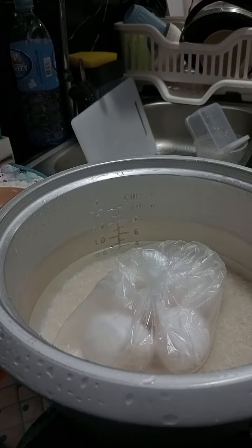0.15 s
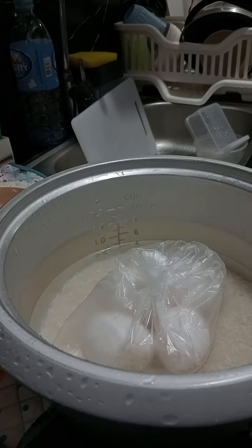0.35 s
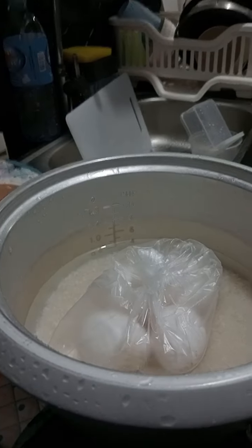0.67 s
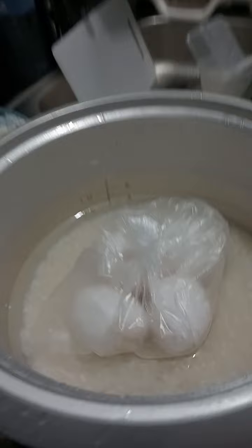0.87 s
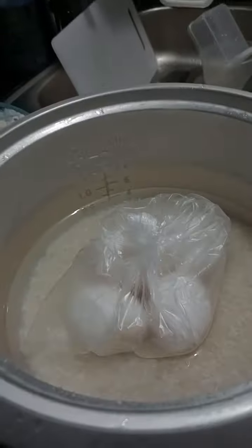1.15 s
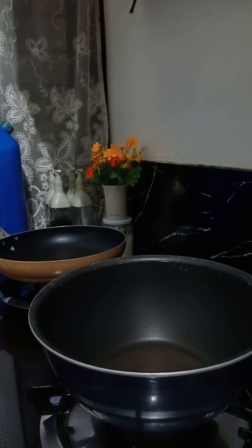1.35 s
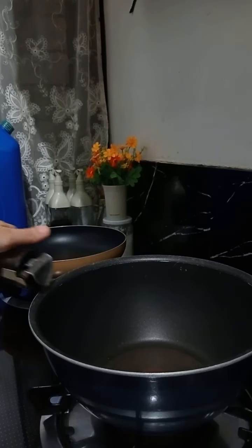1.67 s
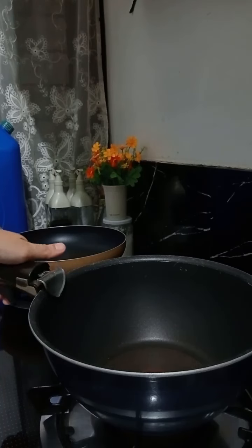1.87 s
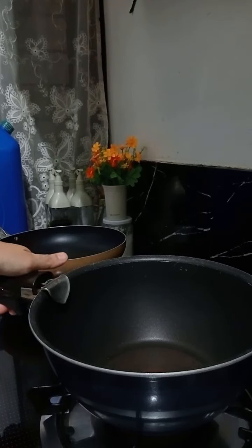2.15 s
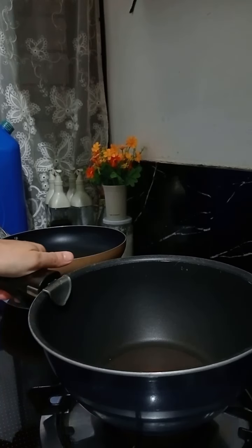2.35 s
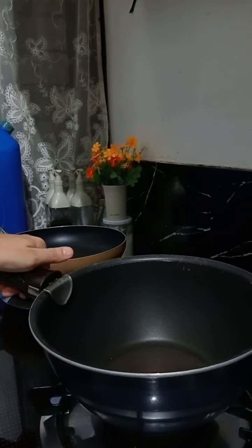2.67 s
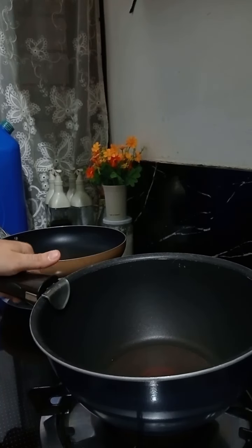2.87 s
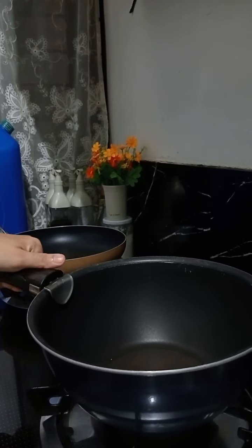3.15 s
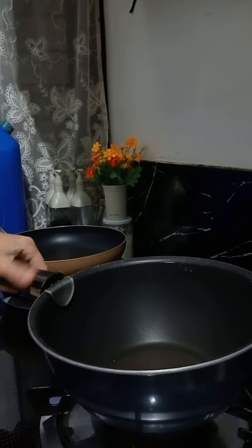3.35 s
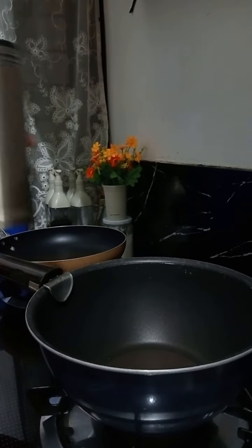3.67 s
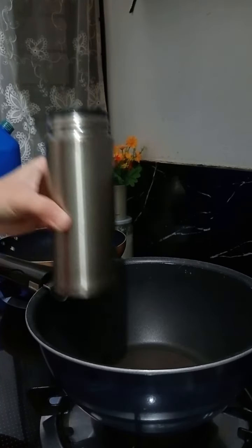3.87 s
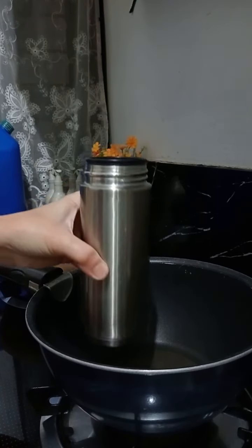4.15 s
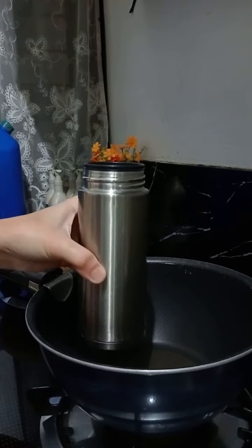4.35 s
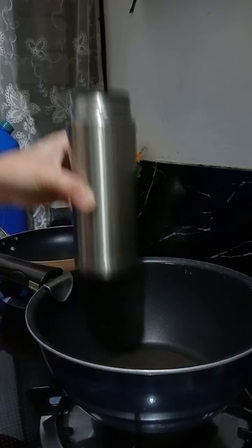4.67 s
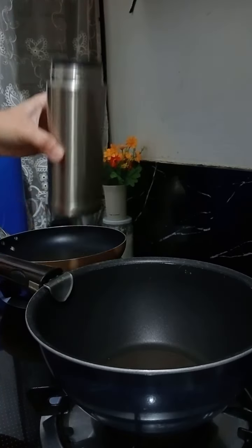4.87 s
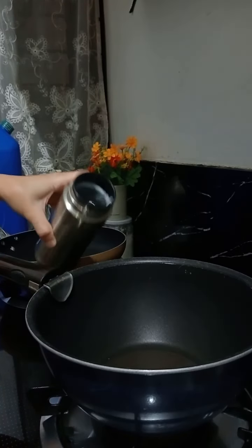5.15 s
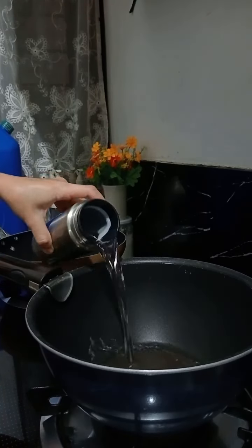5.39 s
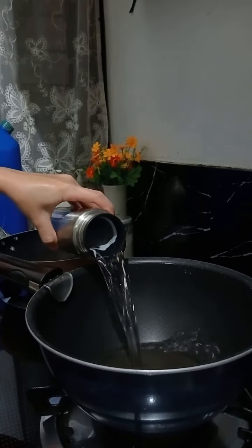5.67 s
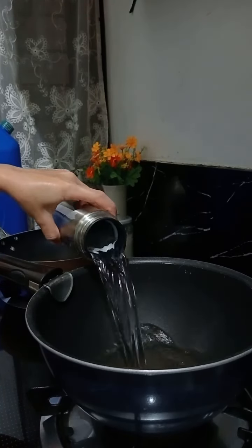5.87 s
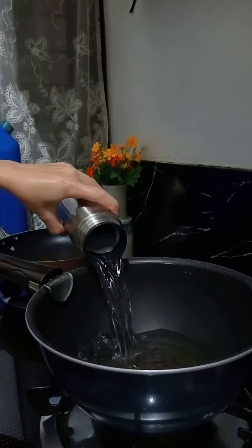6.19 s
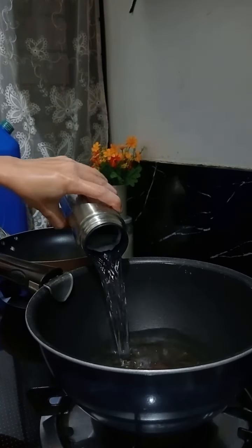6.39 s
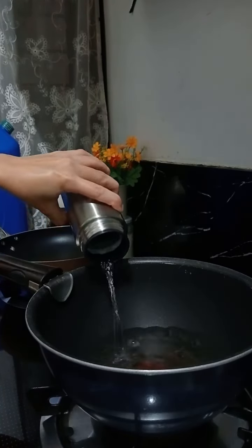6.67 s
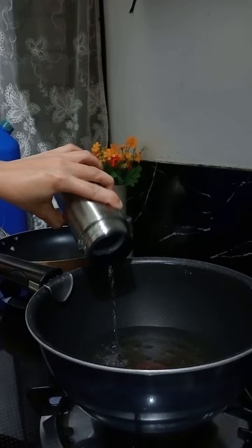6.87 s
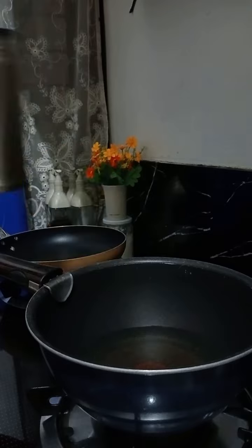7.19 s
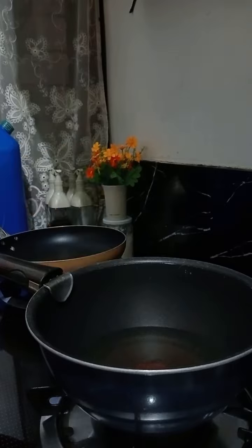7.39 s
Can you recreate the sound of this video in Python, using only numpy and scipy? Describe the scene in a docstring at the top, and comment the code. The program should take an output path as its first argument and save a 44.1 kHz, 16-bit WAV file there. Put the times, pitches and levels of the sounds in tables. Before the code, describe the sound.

Quiet kitchen with faint echoing drips; a steel handle clacks and clicks onto a pan, then water pours in briefly and ends in plops.

```python
"""A hand clamps a steel handle onto a pan: modal ringing under rough contact forces, with stick-slip scraping.
Water then pours into the pan as a crowd of damped bubble tones over hiss, and ends in plops.
A tap drips in a far, echoing corner; hand and sleeve brush softly as shaped friction noise.
The house adds rumble, air noise and narrow hums. Twice the whole sound dips briefly to silence."""
import sys
import numpy as np
from scipy import signal
from scipy.fft import rfft, irfft, next_fast_len
from scipy.io import wavfile
from scipy.ndimage import uniform_filter1d, map_coordinates

SR = 44100
rng = np.random.default_rng(int(sys.argv[2]) if len(sys.argv) > 2 else 0)


def waveform_to_disk(signal):
    """Save audio, clipped to [-1, 1], as 16-bit WAV at the path in sys.argv[1]."""
    frames = np.transpose(np.atleast_2d(signal))
    scaled = np.clip(frames, -1, 1) * 32767
    samples = np.round(scaled).astype(np.int16)
    wavfile.write(sys.argv[1], SR, samples)


N = 332028  # length [samples]

# Spectra give relative power density; filtering normalises their total power.
# Contacts of clamp and pan: (time [s], crack [dB], treble [dB], pan [dB], clamp [dB],
# favoured mode [Hz], its level [dB], rise time constant [s], decay by 60 dB [s])
CONTACTS = [(1.521, -62, -62, -62, -81, 1161, -62, .0005, .061),
            (1.763, -55, -75, -51, -70, 1340, -40, .001, .09),
            (1.772, -64, -85, -80, -76, 2110, -36, .005, .03),
            (1.785, -44, -70, -73, -57, 455, -38, .006, .07),
            (2.14, -38, -45, -56.5, -39, 2110, -32, .0045, .083),
            (2.155, -35.5, -52.5, -42, -52, 3390, -41, .0059, .11),
            (2.342, -38.5, -49, -38, -47, 3560, -32, .0052, .1),
            (2.357, -29, -38.5, -40, -71, 787, -42, .0042, .018),
            (2.409, -55, -65, -44, -79, 346, -50, .015, .11),
            (2.538, -31, -31, -58, -54.5, 3600, -24, .0045, .12),
            (2.55, -15.5, -20, -28, -32, 3720, -11, .002, .024),
            (2.57, -29.5, -41, -44.5, -40, 1161, -35.5, .008, .33),
            (2.838, -51, -58.5, -55, -67, 6435, -66, .031, .13),
            (2.965, -37, -68, -44, -62, 3700, -44, .00053, .031),
            (3.046, -37.5, -57, -44, -57, 1161, -38, .007, .09),
            (3.064, -38.5, -57.5, -39, -69, 1161, -35, .0043, .087),
            (3.112, -60.5, -80, -50, -70, 642, -29, .0005, .043),
            (3.334, -57.5, -77.5, -61, -74, 787, -48, .04, .12),
            (3.419, -30.5, -51, -39, -70, 3390, -36, .002, .045)]
# Modes of the pan: (frequency [Hz], width [Hz], level [dB])
PAN_MODES = [(260, 120, 1), (346, 50, 0.5), (455, 29, 2.5), (599.4, 140, 4), (642, 72, 0.5), (787, 140, 2),
             (1150, 13, -2)]
# Modes of the clamp: (frequency [Hz], width [Hz], level [dB])
CLAMP_MODES = [(1340, 40, -8), (2110, 9, -1), (3040, 70, -4), (3390, 45, -3), (3600, 150, -8),
               (3720, 450, -6), (4110, 17, 2.5), (4700, 90, -3), (5070, 60, -6), (5410, 39, -10),
               (6435, 40, -9), (8200, 38, -18.5), (9100, 98, -13), (10900, 40, -21)]
# Spectrum of the contact crack: (frequency [Hz], density [dB])
CRACK_SPECTRUM = [(60, -43), (130, 0.5), (250, -1.5), (600, -4.5), (1200, 1.5), (2200, 2.5), (3700, -1),
                  (4700, -11.5), (6000, -23), (9000, -73)]
# Spectrum of the contact treble: (frequency [Hz], density [dB])
TREBLE_SPECTRUM = [(2650, -21), (4500, -4), (4840, -10), (7070, -16), (10500, -2), (13300, -16),
                   (15200, -14), (15600, -22.5)]
# Jerks of the clamp along the rim: (time [s], peak [dB], swell by 20 dB [s], fade by 20 dB [s])
RIM_JERKS = [(2.772, -65, .014, .033), (2.845, -66.5, .058, .045), (3.03, -60.5, .02, .17),
             (3.165, -67, .08, .055), (3.3, -70, .07, .09), (3.44, -74, .09, .3)]
# Modes sung by the sliding jaw: (frequency [Hz], width [Hz], level [dB])
JAW_MODES = [(4900, 68, -8), (5170, 48, -15), (5770, 53, -2.5), (6170, 44.8, 2), (6600, 59, 4),
             (7220, 60.3, 1), (7550, 39.8, -5), (8250, 120, -2.5), (8700, 50, -12), (9100, 120, 4),
             (9800, 31, -6), (10800, 110, -20.5), (11600, 110, -7), (12600, 100, -10)]
# Brushes of hand and sleeve: (time [s], peak [dB], swell by 20 dB [s], fade by 20 dB [s])
HAND_BRUSHES = [(.206, -63.5, .014, .04), (.342, -72.5, .3, .2), (.6, -76, .4, .4), (.842, -64, .01, .12),
                (1.282, -63, .022, .2), (1.426, -58, .1, .065), (1.52, -57, .008, .2),
                (2.03, -67, .11, .03), (3.578, -51.5, .03, .08), (3.7, -64, .02, .3),
                (3.766, -64, .1, .095), (4.346, -65.5, .01, .17), (7.226, -58.5, .027, .135),
                (7.5, -71, .04, .3)]
# Spectrum of friction noise, brushed or scraped: (frequency [Hz], density [dB])
FRICTION_SPECTRUM = [(590, -44), (1000, -26), (1330, -7), (1490, -5.5), (1620, -4), (2780, -9),
                     (3880, -4.5), (7720, -24.5), (9940, -17.5), (15600, -35)]
# Far drips: (time [s], level at the tap [dB], bubble pitch [Hz], pitch rise [share])
TAP_DRIPS = [(.09, -61, 3510, .03), (0.148, -44.5, 1616, 0.14), (.29, -60, 3420, 0.042),
             (0.323, -56, 4370, 0.19), (0.507, -45.5, 1654, 0.12), (0.616, -60, 3790, 0.025),
             (.69, -50.5, 1955, 0.084), (0.779, -54.5, 3920, 0.023), (.975, -45, 3755, 0.022),
             (1.06, -47, 2096, 0.055), (1.238, -52, 1090, 0.061), (1.298, -47, 1340, 0.037),
             (1.67, -55, 3090, 0.087), (1.67, -57.5, 4150, 0.11), (3.58, -52.5, 3530, 0.49),
             (3.891, -53, 1599, .05), (4.07, -47.5, 3370, 0.32), (4.265, -50.5, 2220, 0.082),
             (4.341, -50, 3230, 0.3), (4.465, -48, 1486, 0.094), (4.469, -59.5, 4160, 0.035),
             (4.525, -52.5, 4410, 0.058), (4.645, -47.5, 2020, 0.17), (4.7, -51.5, 4140, .05),
             (4.84, -53, 1690, .06), (4.92, -50.5, 3840, 0.032), (4.955, -52.5, 4420, 0.061),
             (5.025, -49.5, 2085, .08), (5.22, -48.5, 1980, 0.14), (5.404, -47, 1708, .1),
             (5.599, -52, 1800, 0.085), (5.69, -53, 2760, .04), (5.699, -53, 4220, 0.045),
             (6.384, -46.5, 1842, .05), (6.388, -49, 3760, 0.053)]
DRIP_FAR_DB = -22.5  # what reaches across the house
# The pouring stream: (time [s], level [dB])
STREAM_FLOW = [(5.2, -84), (5.3, -76), (5.78, -75), (5.93, -65), (6.18, -61), (6.26, -69), (6.5, -71),
               (6.62, -69), (6.7, -73), (6.85, -67), (7.03, -71), (7.15, -105)]
FULL_DB, SPRAY_DB = -60, -64  # full flow, and the spray at full flow
HISS_DB, SPRAY_GROWS = 1.2, 1.1  # hiss over bubbles; spray dB per dB of flow
# Spectrum of the stream's hiss: (frequency [Hz], density [dB])
HISS_SPECTRUM = [(290, -7), (500, 22), (578, -2), (782, 27), (963, -12.5), (1290, 5.5), (3680, 18.5),
                 (5240, -53.5), (6000, -52), (7800, -48), (13200, -120)]
# Spectrum of spray and mist: (frequency [Hz], density [dB])
SPRAY_SPECTRUM = [(2600, -30), (4500, -20), (6200, -5), (7800, -13), (9800, 2), (11500, -8), (13500, -9),
                  (15600, -12)]
# Drops in the pan: (time [s], bubble [dB], bubble pitch [Hz], splash [dB], splash pitch [Hz])
PAN_PLOPS = [(5.28, -58, 2030, -69, 6240), (5.319, -72, 1940, -72, 8800), (5.355, -39.5, 3230, -72, 10100),
             (5.408, -45, 4040, -70, 10200), (5.448, -65, 1780, -69.5, 9400), (5.492, -60, 1660, -68, 6790),
             (5.553, -57.5, 1970, -64, 6700), (5.623, -54, 1940, -68, 7270), (5.688, -56, 2940, -63, 7200),
             (5.732, -54, 1830, -76, 9770), (5.745, -48.5, 4860, -71, 5580), (5.807, -45, 4590, -77, 5380),
             (5.867, -47, 1800, -77, 9100), (5.909, -51, 2600, -70, 6250), (5.948, -48.5, 3530, -78, 9180),
             (5.999, -50.5, 1850, -77, 6170), (6.048, -53.5, 1540, -67.5, 9110),
             (6.147, -52.5, 1280, -67, 9950), (6.185, -55, 2500, -66, 9800),
             (6.219, -56.5, 2260, -70.5, 6080), (6.382, -48.5, 3760, -65, 8400),
             (6.409, -67, 1820, -75, 7250), (6.463, -68, 1790, -74, 14100), (6.583, -41, 3090, -64, 5670),
             (6.597, -45, 3070, -70, 5980), (6.662, -41.5, 4000, -71, 5600), (6.716, -38, 774, -61, 4400),
             (6.728, -45, 1150, -64, 10500), (6.776, -49.5, 2290, -64, 6700), (6.826, -50, 2570, -59, 7200),
             (6.836, -44.5, 2720, -58, 10300), (6.897, -40, 3790, -80, 6860), (6.947, -43, 4520, -79, 9400)]
PLOP_T60_S = .048
FROTH_DB, MIST_DB = -2.5, 2.5  # froth over the bubble, mist over the splash
# Modes of the pan's floor under falling drops: (frequency [Hz], width [Hz], level [dB])
FLOOR_MODES = [(3250, 71, 0), (3900, 29, -10), (4150, 110, -3), (4860, 140, -8), (5570, 38, -18),
               (5860, 97, -17), (6380, 99, -16), (6770, 66, -14), (7050, 180, -15), (7870, 43, -20),
               (8480, 86, -17), (9050, 120, -18), (9430, 50, -21), (10100, 60, -19)]
FLOOR_DB, DAMPING_DB_PER_S = 14.7, 4.45  # floor over splash when dry; rising water damps it
# Rumble of the house: (time [s], level [dB])
RUMBLE_LEVEL = [(0, -61), (1.2, -59.5), (1.3, -62.5), (3.4, -59), (3.6, -61.5), (5.5, -63.5), (7, -60),
                (7.53, -62.5)]
# Spectrum of the rumble: (frequency [Hz], density [dB])
RUMBLE_SPECTRUM = [(15, -54.5), (30, -30.5), (48, -10), (64, 7.5), (85, 1.5), (125, 2), (250, -15),
                   (500, -12.5), (900, -19), (1800, -62.5)]
# Spectrum of the air noise: (frequency [Hz], density [dB])
AIR_SPECTRUM = [(200, -40.5), (500, 1), (1000, 4), (2500, -1), (4000, -4), (5200, -16.5), (8000, -31),
                (10000, -20), (12500, -36.5), (15600, -38)]
AIR_DB = -63.7
# Wavering hums: (frequency [Hz], width [Hz], level [dB])
HOUSE_HUMS = [(160.3, 34, -65), (260, 21, -72), (362, 22, -70), (755.5, 27, -78)]
WHINE_HZ, WHINE_DB = 6540, -91.5
# Reverberation of the kitchen, before stretching: (frequency [Hz], decay by 60 dB [s])
KITCHEN_DECAY = [(200, 0.28), (2000, .35), (6000, 0.35), (14000, 0.23)]
# Brief silences: (time [s], half length [s])
SILENCES = [(1.264, 0.0067), (3.477, 0.0099)]
TOP_HZ = 15700  # band limit


def amp(db):
    """Decibel law: the amplitude ratio of a level."""
    return 10 ** (np.asarray(db) / 20)


def unit(x):
    """Power normalisation: x scaled to an RMS of 1."""
    return x / np.sqrt(np.mean(x ** 2) + 1e-20)


def along(points, hz):
    """Logarithmic pitch scale: (frequency, value) points interpolated on a log axis."""
    f, v = np.transpose(points)
    return np.interp(np.log(hz + 1), np.log(f + 1), v)


def level_curve(rows):
    """Amplitude envelope: gain per sample, linear in dB between rows and silent outside them."""
    s, db = np.transpose(rows)
    return amp(np.interp(np.arange(N) / SR, s, db, -150, -150))


def swells(rows):
    """Exponential growth and decay: summed gain of strokes that each swell to a peak and fade."""
    t = np.arange(0, N, 32) / SR
    gain = np.zeros(len(t))
    for s, db, rise, fall in rows:
        gain += amp(db - 20 * np.maximum((s - t) / rise, (t - s) / fall))
    return np.interp(np.arange(N) / SR, t, gain)


def wobble(rate):
    """Band-limited fluctuation: a smooth random curve with rate knots a second."""
    at = np.arange(0, N, 16)
    knots = rng.standard_normal(int(N * rate / SR) + 4)
    return np.interp(np.arange(N), at, map_coordinates(knots, [at * rate / SR]))


def patchy(depth_db):
    """Time-frequency modulation: white noise with smooth patches of random gain."""
    z = signal.stft(rng.standard_normal(N), nperseg=512)[2]
    over_hz = uniform_filter1d(rng.standard_normal(z.shape), 6, 0)
    field = uniform_filter1d(over_hz, 8, 1)
    return unit(signal.istft(z * amp(depth_db * unit(field)), nperseg=512)[1][:N])


def filtered(x, response):
    """Linear filtering: x through a frequency response whose power gain for white noise is 1."""
    m = next_fast_len(N + SR // 2)
    h = response(np.fft.rfftfreq(m, 1 / SR))
    gain = unit(np.abs(h)) * np.exp(1j * np.angle(h))
    return irfft(rfft(x, m) * gain, m)[:N]


def coloured(x, spectrum):
    """Spectral shaping: x filtered by the density points of a spectrum."""
    return filtered(x, lambda hz: amp(along(spectrum, hz)))


def resonant(x, modes):
    """Modal superposition: x through parallel resonances of alternating sign."""
    def response(f):
        total = 0
        for k, (c, w, db) in enumerate(modes):
            total = total + (-1) ** k * amp(db) * 1j * f * w / (c * c - f * f + 1j * f * w)
        return total
    return filtered(x, response)


def note(x, hz, width_hz):
    """Damped resonance: x ringing in one mode, at unchanged noise power."""
    r = np.exp(-np.pi * width_hz / SR)  # pole radius
    edge = np.sqrt(1 - r * r)
    return signal.lfilter([edge, 0, -edge], [1, -2 * r * np.cos(2 * np.pi * hz / SR), r * r], x)


def struck(shape, modes):
    """Forced vibration: a rough force drives modes whose energy shares vary by a few dB."""
    total = np.zeros(len(shape))
    for hz, width, db in modes:
        force = shape * rng.standard_normal(len(shape))
        near = note(force, hz, hz / 2)  # a mode feels only the force near its pitch
        ring = unit(note(near, hz, width))
        total += amp(db + 1.2 * rng.standard_normal()) * ring
    return total * np.std(shape)


def bubble(hz, rise, t60, attack):
    """Bubble resonance: a damped tone whose pitch climbs by the share rise over its first 20 dB of decay."""
    t = np.arange(round(t60 * SR) + 2) / SR
    phase = 2 * np.pi * hz * (t + 1.5 * rise * t * t / t60)
    return np.sin(phase) * amp(-60 * t / t60) * (1 - np.exp(-t / attack))


def tail(stretch):
    """Diffuse reverberation: a fresh noise response of energy 1 whose decay depends on frequency."""
    hz, t, z = signal.stft(rng.standard_normal(SR // 3), SR, nperseg=128)
    t60 = stretch * along(KITCHEN_DECAY, hz)[:, None]
    answer = signal.istft(z * amp(-60 * t / t60), SR, nperseg=128)[1]
    return answer / np.linalg.norm(answer)


def roomy(x, wet_db):
    """Direct and reverberant field: x plus the kitchen's answer, 300 samples later."""
    return x + amp(wet_db) * signal.fftconvolve(x, np.pad(tail(stretch=1), (300, 0)))[:N]


def add(track, s, sound):
    """Superposition: mixes sound into track from second s."""
    part = track[round(s * SR):][:len(sound)]
    part += sound[:len(part)]


def house():
    """Background noise: restless low rumble, steady air hiss, wavering hums and a faint early whine."""
    rumble = level_curve(RUMBLE_LEVEL) * amp(wobble(20)) * coloured(patchy(depth_db=1.0), RUMBLE_SPECTRUM)
    air = amp(AIR_DB) * coloured(patchy(depth_db=2.5), AIR_SPECTRUM)
    hums = np.zeros(N)
    for hz, width, db in HOUSE_HUMS:
        hums += amp(db + 1.2 * wobble(4.8)) * note(rng.standard_normal(N), hz, width)
    before_first_silence = np.arange(N) < SILENCES[0][0] * SR
    whine = amp(WHINE_DB) * note(rng.standard_normal(N), WHINE_HZ, 120) * before_first_silence
    return rumble + air + hums + whine


def tap():
    """Reverberant propagation: each far drip is a bubble heard only through its own slowly building echo."""
    out = np.zeros(N)
    for s, db, hz, rise in TAP_DRIPS:
        echo = tail(stretch=0.98)
        echo *= 1 - np.exp(-np.arange(len(echo)) / SR / .012)
        drip = signal.fftconvolve(bubble(hz, rise, t60=0.064, attack=0.00017), echo)
        add(out, s, amp(db + DRIP_FAR_DB) * unit(drip))
    return out


def rustle():
    """Soft friction: shaped noise swells and fades under the moving hand."""
    return swells(HAND_BRUSHES) * coloured(patchy(depth_db=1.2), FRICTION_SPECTRUM)


def clamp():
    """Impact excitation: each rough contact force cracks, rings pan and clamp, and favours one mode."""
    force, rings = np.zeros((2, N)), np.zeros(N)
    t = np.arange(-SR // 10, SR // 3) / SR  # around the peak of the force
    for s, crack_db, treble_db, pan_db, clamp_db, hz, note_db, rise, t60 in CONTACTS:
        shape = np.exp(np.minimum(t, 0) / rise) * amp(-60 * np.maximum(t, 0) / t60)
        for bus, db in zip(force, [crack_db, treble_db]):
            add(bus, s + t[0], amp(db) * shape * rng.standard_normal(len(t)))
        mode_hz, width_hz, _ = min(PAN_MODES + CLAMP_MODES, key=lambda mode: abs(mode[0] - hz))
        pan_ring = amp(pan_db) * struck(shape, PAN_MODES)
        clamp_ring = amp(clamp_db) * struck(shape, CLAMP_MODES)
        favoured = struck(shape, [(mode_hz, width_hz, note_db)])
        add(rings, s + t[0], pan_ring + clamp_ring + favoured)
    force *= unit(amp(2.0 * wobble(160)))  # the parts chatter against each other
    return coloured(force[0], CRACK_SPECTRUM) + coloured(force[1], TREBLE_SPECTRUM) + rings


def slide():
    """Sliding friction: steel dragged on steel makes rough noise, partly singing in the jaw's modes."""
    roughness = unit(amp(3 * wobble(120)))
    rough = swells(RIM_JERKS) * roughness * rng.standard_normal((2, N))
    return amp(5.5) * coloured(rough[0], FRICTION_SPECTRUM) + resonant(rough[1], JAW_MODES)


def bubble_crowd():
    """Bubble entrainment: many small bubbles of random pitch sound at random times along the stream."""
    crowd = np.zeros(N)
    start, end = STREAM_FLOW[0][0], STREAM_FLOW[-1][0]
    z, size = rng.standard_normal((2, 2000, 1))
    hz = np.clip(2800 * np.exp(0.53 * z), 600, 12000)
    small = amp(3.5 * size) * bubble(hz, 0.024, t60=0.045, attack=.004)
    for u, sound in zip(rng.random(len(small)), small):
        add(crowd, start + (end - start) * u, sound)
    crowd = signal.fftconvolve(crowd, tail(stretch=0.19))[:N]  # the pan's bowl blurs them
    # the crowd grows fainter above about 5 kHz
    return unit(filtered(crowd, lambda hz: 1 / (1 + (hz / 4800) ** 4) + 0.12))


def plops():
    """Drop impact: each drop sounds a bubble with froth, a splash with mist, and the pan's floor."""
    out, mist, floor = np.zeros((3, N))
    t = np.arange(SR // 8) / SR
    envelope = amp(-60 * t / PLOP_T60_S) * (1 - np.exp(-t / 0.0035))
    for s, db, hz, splash_db, splash_hz in PAN_PLOPS:
        burst = envelope * rng.standard_normal((4, len(t)))
        add(out, s, amp(db) * bubble(hz, 0.062, PLOP_T60_S, attack=0.00073))
        # a froth of like bubbles around the main one
        froth = signal.lfilter(*signal.iirpeak(hz, 1.8, SR), note(burst[0], hz, 0.15 * hz))
        add(out, s, amp(db + FROTH_DB) * froth)
        add(out, s, amp(splash_db) * note(note(burst[1], splash_hz, 1500), splash_hz, 1500))
        droplet = bubble(splash_hz, 0.035, PLOP_T60_S, attack=.002)  # thrown up
        add(out, s, amp(splash_db) * droplet)
        add(mist, s, amp(splash_db + MIST_DB) * burst[2])
        floor_db = splash_db + FLOOR_DB - DAMPING_DB_PER_S * (s - STREAM_FLOW[0][0])
        add(floor, s, amp(floor_db) * burst[3])
    return out + coloured(mist, SPRAY_SPECTRUM) + resonant(floor, FLOOR_MODES)


def pour():
    """Flow noise: the stream's level scales its bubbles, hiss and spattering spray; drops plop besides."""
    flow = level_curve(STREAM_FLOW)
    hiss = amp(HISS_DB) * flow * coloured(patchy(depth_db=2.5), HISS_SPECTRUM)
    spray_level = amp(SPRAY_DB) * (flow / amp(FULL_DB)) ** SPRAY_GROWS
    spatter = amp(4.3 * wobble(28))
    spray = spray_level * unit(spatter * coloured(patchy(depth_db=3), SPRAY_SPECTRUM))
    return hiss + spray + flow * bubble_crowd() + plops()


def scene():
    """Superposition of sources: handle and water excite the room; the handle stops at the second silence."""
    before_second_silence = np.arange(N) < SILENCES[1][0] * SR
    handle = roomy(clamp() + slide(), wet_db=-9) * before_second_silence
    water = roomy(pour(), wet_db=-12)
    return (house() + tap() + rustle() + handle + water)[None]


def record(dry):
    """Saturation and band limiting: peaks are rounded, two silences faded out and in, the top cut off."""
    t = np.arange(N) / SR
    fades = np.prod([np.clip(np.abs(t - s) / half, 0, 1) for s, half in SILENCES], axis=0)
    top = .66  # amplitude that rounding approaches
    rounded = dry / (1 + np.abs(dry / top) ** 4) ** (1 / 4)
    m = next_fast_len(N + SR // 2)
    passed = np.fft.rfftfreq(m, 1 / SR) < TOP_HZ
    return irfft(rfft(rounded * fades, m) * passed, m)[:, :N]


dry = scene()
out = record(dry)
waveform_to_disk(out)
```